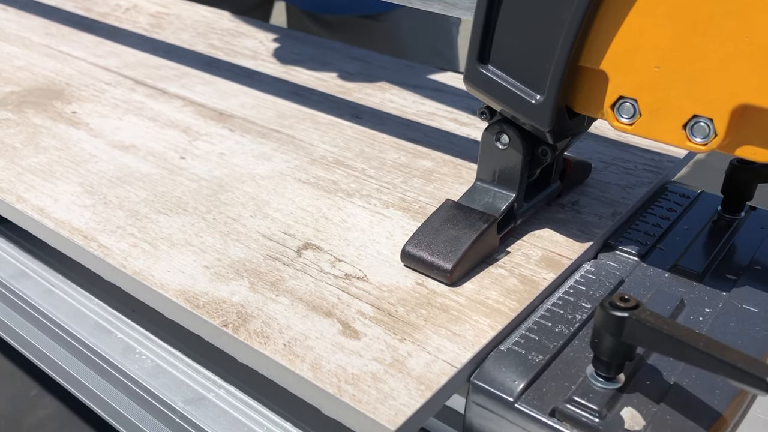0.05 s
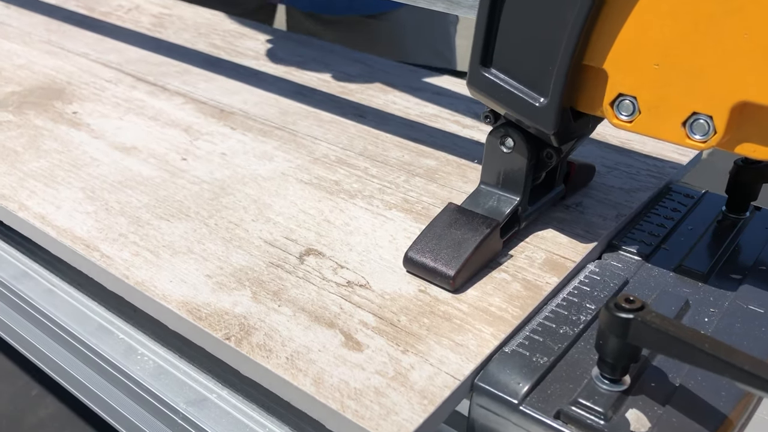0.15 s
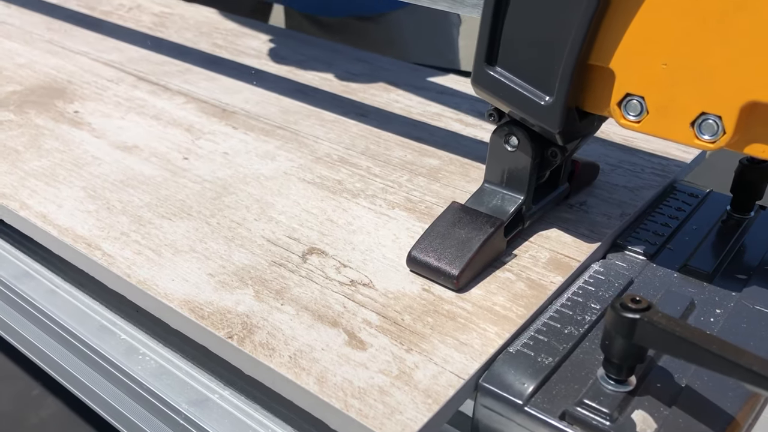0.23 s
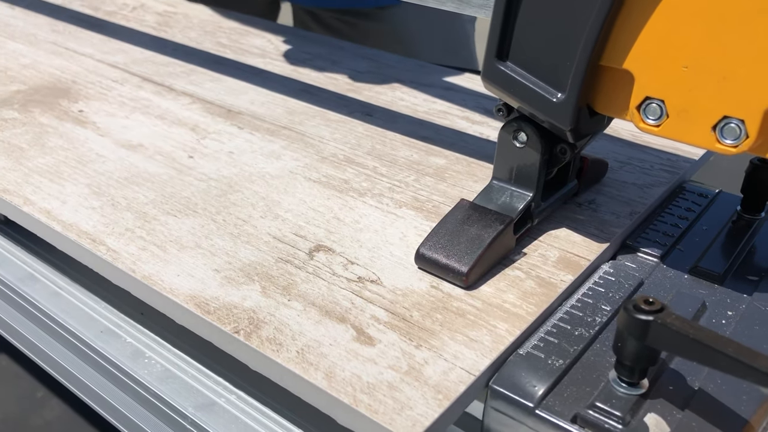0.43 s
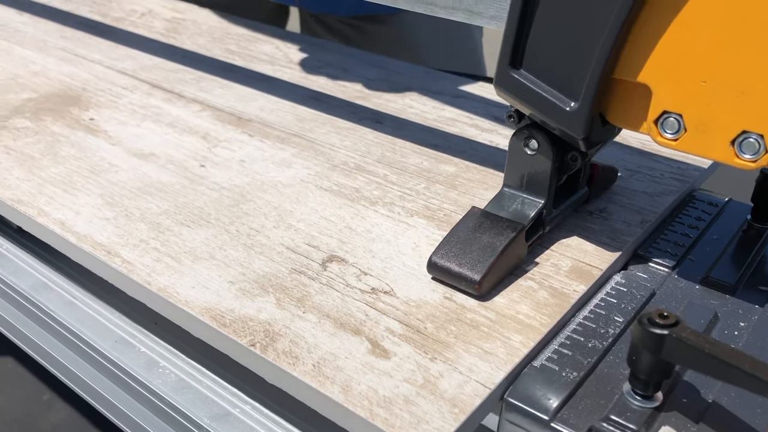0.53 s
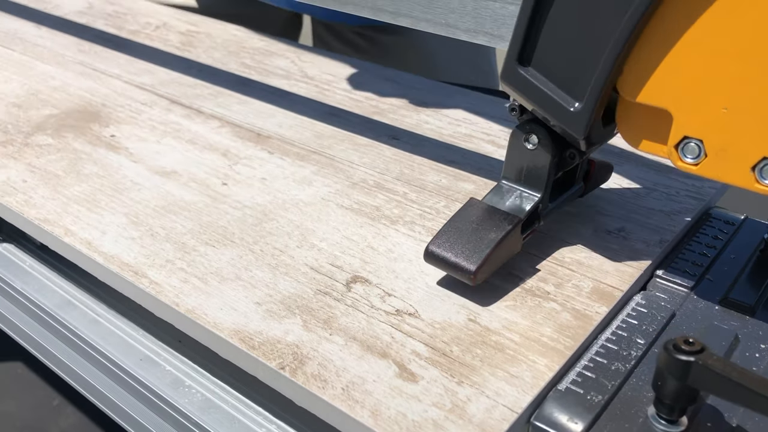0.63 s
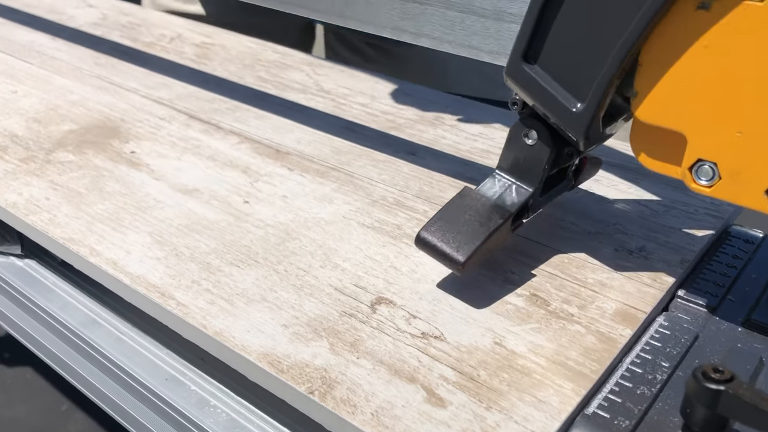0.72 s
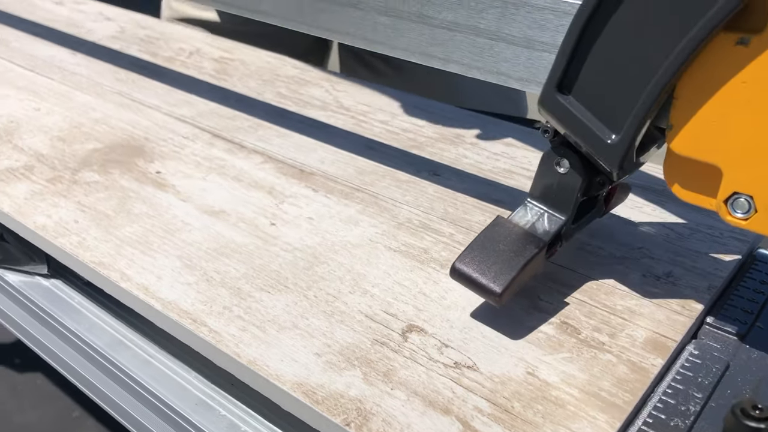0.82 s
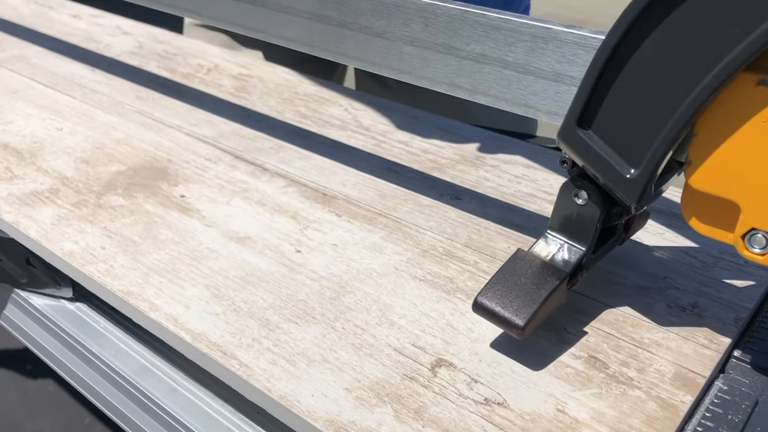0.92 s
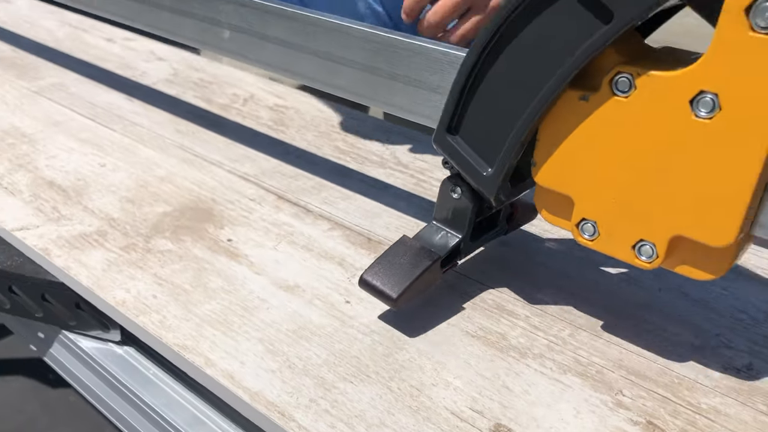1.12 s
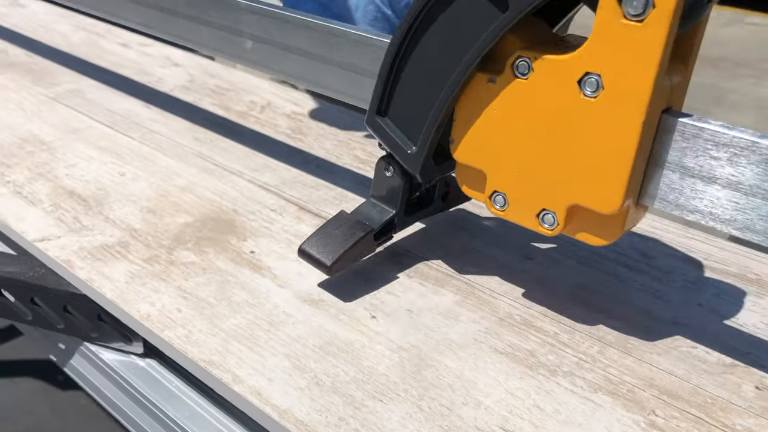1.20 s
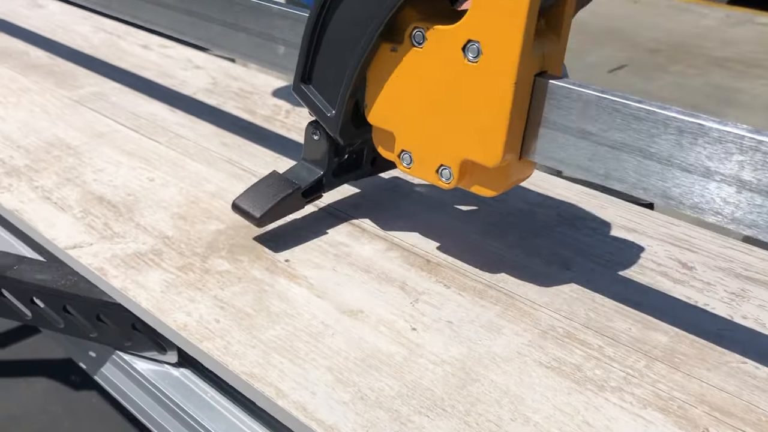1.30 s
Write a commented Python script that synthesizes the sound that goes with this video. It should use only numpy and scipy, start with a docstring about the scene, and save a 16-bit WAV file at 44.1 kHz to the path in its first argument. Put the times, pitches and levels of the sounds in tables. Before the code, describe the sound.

A hand tile cutter snaps a tile with sharp clacks, then knocks and slides back.

```python
"""A hand tile cutter outdoors, over a steady low rumble. The handle is pressed: the bench bumps and grit
crunches under a scored tile. The tile snaps and its halves knock on the cutter's bed, ringing tile and
frame. The lever is lifted against its stop with a knock, a thud and a brief buzz. Snap and knocks travel
as bending waves, so their treble arrives ahead of their bass. Last, the carriage rolls back along its
rail with a growing hiss."""
import sys
import numpy as np
from scipy import signal
from scipy.fft import rfft, irfft
from scipy.io import wavfile

SR = 44100
rng = np.random.default_rng(int(sys.argv[2]) if len(sys.argv) > 2 else 0)


def int16_out(signal):
    """Quantize to a 16-bit WAV file."""
    q = np.round(np.clip(np.atleast_2d(signal).T, -1, 1) * 32767)
    wavfile.write(sys.argv[1], SR, q.astype(np.int16))


N = 59535
T = np.arange(N) / SR
HZ = np.maximum(np.arange(N + 1) * SR / (2 * N), 1)

# tone of the outdoor rumble: f/Hz, level/dB
RUMBLE_COLOUR = [(20, -35.5), (45, -13), (75, 2.5), (115, 1), (170, -8), (340, -7), (520, -17.5),
                 (1000, -25), (2000, -25.5), (4000, -33.5), (8000, -43.5), (17000, -50.5)]
# bumps of the bench as the handle is pressed: t/s, level/dB
BENCH_BUMPS = [(0.0, -39), (0.056, -37.5), (0.187, -42.5)]
# notes the bench rings at: f/Hz, level/dB, t60/s (the time to fade by 60 dB)
BENCH_NOTES = [(112, 0, 0.25), (131, -3, 0.23), (161, -6, 0.26), (205, -8.5, 0.13), (307, -6.5, .12)]
# grit crushed under the tile and in the joints: t/s, level/dB, rise/s, t60/s, bass/dB, treble/dB
CRUNCHES = [(0.0005, -29, 0.0051, 0.074, 1, 4.5), (0.016, -36, 0.0027, 0.16, 6.5, -13),
            (0.084, -50, .02, 0.48, -8, -1), (0.146, -37.5, 0.0024, .07, -1.5, -0.5),
            (0.185, -34, .001, 0.076, 18, -30), (0.2005, -39.5, .001, .04, -5, 3.5),
            (0.206, -34, 0.0016, 0.069, -2, -1), (0.347, -41, 0.0024, .07, -7, 11.5),
            (0.4103, -30.5, 0.0014, .05, -9, 5), (0.436, -34, 0.0048, .09, 9, 6),
            (0.457, -41, .002, .07, 1, -2), (0.836, -32.5, .003, 0.096, -9, -3),
            (0.946, -56, .01, 0.78, -7, 5)]
# tone of the grit: f/Hz, level/dB
CRUNCH_COLOUR = [(100, -17), (350, -7), (800, 2), (1300, 3.5), (1900, -1), (2600, -8), (3600, -1),
                 (6000, -10), (10000, -11.5), (12000, -10.5), (17000, -18.5)]
# tiny ticks of the lever's joints: t/s, level/dB
JOINT_TICKS = [(0.085, -59), (0.5667, -69.5), (0.583, -64.5), (0.5928, -58.5), (0.909, -66)]
# how hard the carriage rolls: t/s, level/dB
ROLL_EFFORT = [(0.9, -58.5), (1.034, -56.5), (1.067, -43), (1.12, -40), (1.155, -40), (1.2, -36.5),
               (1.27, -36.5), (1.35, -35.5)]
# tone of the rollers' hiss: f/Hz, level/dB
HISS_COLOUR = [(100, -38), (280, -18.5), (430, -1), (700, -5), (1100, -3), (1400, -9.5), (2100, -12.5),
               (3200, -15.5), (4000, -19), (6300, -16), (7400, -24.5), (9500, -30.5), (11500, -27.5),
               (17000, -34)]
# notes of the rail at mid-stroke: f/Hz, width/Hz, level/dB, glide/(Hz/s), growth/(dB/s)
RAIL_NOTES = [(695, 27, -6, -800, -5), (824, 29, -9.5, -400, -26), (1072, 17, -5, 330.5, 3),
              (1284, 23, -16, 301, 22), (1575, 42, -11.5, -200, 7), (1840, 90, -10.5, -0.5, 12),
              (2488, 72, -11.5, 450, -20), (3050, 61, -18, 0, -4), (4570, 110, -22, 1, 3),
              (5065, 140, -11, 201, -15), (6240, 330, -10.5, 700, 20)]
# the lever hits its stop: t/s, level/dB, t60/s, crack/dB, ring/dB
LEVER_KNOCK = (0.8289, -15, 0.0755, 5.5, -16)
# tone of that knock: f/Hz, level/dB
KNOCK_COLOUR = [(60, -19), (110, -17), (165, -8.5), (270, -10), (420, -8.5), (600, -11), (850, -2.5),
                (1150, -5), (1850, 1.5), (2300, -0.5), (2850, 5), (3500, -11), (5100, -16.5), (6100, -4),
                (7200, -16), (10000, -22), (17000, -32)]
# the lever's foot thuds: t/s, level/dB, t60/s
FOOT_THUD = (0.836, -22, 0.16)
# tone of that thud: f/Hz, level/dB
FOOT_COLOUR = [(60, -22.5), (115, -12), (170, -0.5), (270, -12.5), (390, -2), (560, -6), (720, -9.5),
               (850, -1.5), (1300, -13), (3000, -23.5), (17000, -62)]
# the lever buzzes as it settles: t/s, level/dB
LEVER_BUZZ = (0.856, -26.5)
# notes of the lever: f/Hz, level/dB, t60/s
LEVER_NOTES = [(395, -9, .27), (724, -17, 0.38), (822, -12, 0.22), (1213, -8.5, 0.13), (1767, 2, 0.082),
               (1790, -0.5, 0.11), (1868, -7, .36), (1888, 1, .24), (1910, -4, .11), (2810, -26, 0.16)]
# the tile snaps and its halves hit the bed:
# t/s, level/dB, bass/dB, treble/dB, t60/s, crack/dB, tile ring/dB, frame ring/dB
TILE_CLACKS = [(0.2236, -12, -7, -0.5, 0.049, -1, -12.5, -8), (0.2281, -22, 1, 1, .04, 2.5, -12, -10.5),
               (0.2432, -15.5, -2.5, 4.5, 0.068, -7.5, -4.5, -27.5),
               (0.2542, -16.5, 0, -2, 0.081, -3, -9, -23), (0.2599, -19, 8.5, 4.5, .06, -7.5, -11.5, -40.5),
               (0.2730, -17.5, 9.5, -0.5, 0.11, -4.5, -9.5, -14),
               (0.2932, -26, 6.5, -12, 0.093, -15.5, -6.5, -9),
               (0.3629, -17, -17.5, -4, 0.076, -2.5, -25, -4),
               (0.3656, -17.5, -20, -1, 0.044, -4, -31, -1.5)]
# tone of a clack: f/Hz, level/dB
TILE_COLOUR = [(60, -24), (120, -15.5), (190, -5.5), (260, -13), (400, -4.5), (700, -8), (1100, -0.5),
               (1400, -4.5), (1850, 1), (2700, -6), (3200, -8), (3800, -5.5), (4400, -7), (5200, -2.5),
               (6200, -3.5), (7300, -14.5), (10000, -19), (17000, -25.5)]
# notes of the tile: f/Hz, level/dB, t60/s
TILE_NOTES = [(197, -2.5, 0.12), (444, -5.5, 0.14), (733, -4, 0.15), (1057, 2, 0.17), (1764, -8, .15),
              (2144, -3.5, .11), (2560, 2, 0.097), (3064, -2, .13), (3515, -4.5, .11), (3660, 1, 0.076),
              (3894, -1, .1), (5280, 1, 0.046), (5680, -9, 0.087), (5750, -3, .1), (6360, -3.5, 0.17),
              (7180, -8.5, .12)]
# notes of the cutter's frame: f/Hz, level/dB, t60/s
FRAME_NOTES = [(568, -9.5, 0.2), (997, -12.5, .13), (1346, -9.5, 0.17), (1545, 0, .04), (1758, 7.5, 0.039),
               (1851, -0.5, .3), (1970, 6.5, .05), (2420, 1, .045), (3390, -6, 0.15), (3944, -7, .11),
               (5420, -8, 0.079), (8090, -10.5, .11), (8550, -13, 0.082)]


def from_db(db):
    """Turn decibels into a factor to multiply by."""
    return 10 ** (np.asarray(db) / 20)


def rms_one(x):
    """Scale a sound so that its average power is 1."""
    return x / np.sqrt(np.mean(x ** 2) + 1e-20)


def burst(x):
    """Give a short sound the energy of ten milliseconds at power 1."""
    return rms_one(x) * np.sqrt(.01 * SR / N)


def filtered(x, response):
    """Change the strength and timing of each frequency in a sound."""
    return irfft(rfft(x, 2 * N) * response)[:N]


def colour(points, bass_db=0, treble_db=0):
    """A filter through (Hz, dB) points, with bass and treble controls."""
    hz, db = np.transpose(points)
    curve_db = np.interp(np.log(HZ), np.log(hz), db)
    curve_db = curve_db + bass_db / (1 + (HZ / 750) ** 2) + treble_db / (1 + (4500 / HZ) ** 2)
    # this fold keeps the filter from sounding before it is struck
    cepstrum = irfft(np.log(from_db(curve_db)))
    cepstrum[1:N] *= 2
    cepstrum[N + 1:] = 0
    return np.exp(rfft(cepstrum))


def fade(t60):
    """A level that falls by 60 dB every t60 seconds."""
    return np.exp(-np.minimum(np.log(1000) * T / t60, 10 * np.pi))


def add(out, start, x):
    """Mix x into out, beginning at start seconds."""
    i = max(int(start * SR), 0)
    out[i:] += x[:N - i]


def grains(rough_db):
    """Noise made of countless tiny contacts of uneven size."""
    return rms_one(rng.standard_normal(N) * from_db(rough_db * np.minimum(rng.exponential(1, N), 5)))


def dense_ring(t60, bass_linger):
    """Crowded notes fade like noise; t60 holds at 2 kHz, and bass_linger makes low ones last longer."""
    noise = rfft(rng.standard_normal(N))
    hz = np.arange(len(noise)) * SR / N
    edges_hz = [30, 250, 500, 1000, 2000, 4000, 8000, 20000]
    out = np.zeros(N)
    for low, high in zip(edges_hz, edges_hz[1:]):
        band = irfft(noise * (hz >= low) * (hz < high), N)
        out += band * fade(t60 * (2000 / np.sqrt(low * high)) ** bass_linger)
    return burst(out)


def ring(notes, samples=16000):
    """A struck object rings at its own notes, each a little stronger or weaker on every blow."""
    t = T[:samples]
    out = np.zeros(N)
    for hz, db, t60 in notes:
        strength = from_db(db + rng.normal(0, 0.93)) * rng.choice([-1, 1])
        out[:samples] += strength * np.sin(2 * np.pi * hz * t) * np.exp(-np.log(1000) * t / t60)
    return burst(out)


def bending(travel_s, fastest_hz, slowest_hz=898):
    """A filter for bending waves: between the two pitches, lower ones travel slower and arrive later."""
    delay_s = travel_s * (np.sqrt(fastest_hz / np.clip(HZ, slowest_hz, fastest_hz)) - 1)
    return np.exp(-2j * np.pi * np.cumsum(delay_s) * SR / (2 * N))


def blow(tone, t60, crack_db, rebounds_per_s=1500):
    """One sharp crack, a quick rattle of rebounding contacts and the dense ring after it."""
    click = burst(1. * (T == 0))
    rebounds = (rng.random(N) < rebounds_per_s / SR) * rng.standard_normal(N)
    crack = burst(click + from_db(-2) * burst(rebounds * fade(t60=0.024)))
    return burst(filtered(from_db(crack_db) * crack + dense_ring(t60, bass_linger=0.096), tone))


def outdoor_rumble():
    """Steady noise, strongest in the bass."""
    return from_db(-48) * rms_one(filtered(rng.standard_normal(N), colour(RUMBLE_COLOUR)))


def yard_echo(sound):
    """The yard sends back a faint wash of echoes that gets duller as it fades."""
    swell = 1 - fade(t60=0.02)
    tail = dense_ring(t60=0.29, bass_linger=.18) * swell
    tail /= np.sqrt(np.sum(tail ** 2))
    return from_db(-19) * filtered(sound, rfft(tail, 2 * N))


def bench():
    """The bench under the cutter rings with low, dull bumps."""
    out = np.zeros(N)
    for start, db in BENCH_BUMPS:
        add(out, start, from_db(db) * ring(BENCH_NOTES))
    return out


def grit(rough_db=2.5, frame_db=-8):
    """Crushed grains crunch and faintly ring the frame; the lever's joints tick."""
    out = np.zeros(N)
    for start, db, rise_s, t60, bass_db, treble_db in CRUNCHES:
        crunch = grains(rough_db) * fade(t60) * np.minimum(T / rise_s, 1)
        crunch = burst(filtered(crunch, colour(CRUNCH_COLOUR, bass_db, treble_db)))
        add(out, start, from_db(db) * (crunch + from_db(frame_db) * ring(FRAME_NOTES)))
    for start, db in JOINT_TICKS:
        tick = filtered(grains(rough_db) * fade(t60=0.022), colour(CRUNCH_COLOUR, treble_db=2))
        add(out, start, from_db(db) * burst(tick))
    return out


def rail_note(hz, width_hz, db, glide, growth, mid_stroke_s=1.2, waver_hz=9.1, wavers_per_s=25):
    """A wavering note of the shaken rail; it glides as the carriage changes the rail's free length."""
    glide_start_s = ROLL_EFFORT[1][0]
    from_mid_s = np.maximum(T, glide_start_s) - mid_stroke_s
    shake = [filtered(rng.standard_normal(N), 1 / (1 + 2j * HZ / width_hz) ** 2) for _ in range(2)]
    waver = waver_hz * np.interp(T * wavers_per_s, np.arange(100), rng.standard_normal(100))
    phase = 2 * np.pi * np.cumsum(hz + glide * from_mid_s + waver) / SR
    note = rms_one(shake[0] * np.cos(phase) + shake[1] * np.sin(phase))
    return from_db(db + growth * from_mid_s) * note


def carriage(treble_hz=3000, brightening=0.71):
    """Rollers hiss over the slightly rough rail and make it ring; faster is louder and brighter."""
    times, levels_db = np.transpose(ROLL_EFFORT)
    effort_db = np.interp(T, times, levels_db)
    hiss = rms_one(filtered(grains(rough_db=1.5), colour(HISS_COLOUR)))
    rail = sum(rail_note(*row) for row in RAIL_NOTES)
    roll = from_db(-2) * hiss + from_db(-4) * rail
    treble = filtered(roll, 1 / (1 + (treble_hz / HZ) ** 2))
    treble_gain = from_db(brightening * (effort_db - levels_db[-1]))
    return (T > times[0]) * from_db(effort_db) * (roll - treble + treble * treble_gain)


def lever():
    """The lever knocks on its stop, its foot thuds, and a brief buzz leaves it ringing."""
    out = np.zeros(N)
    start, db, t60, crack_db, ring_db = LEVER_KNOCK
    knock = blow(colour(KNOCK_COLOUR), t60, crack_db)
    add(out, start, from_db(db) * (knock + from_db(ring_db) * ring(LEVER_NOTES)))
    start, db = LEVER_BUZZ
    add(out, start, from_db(db) * ring(LEVER_NOTES))
    out = filtered(out, bending(travel_s=0.00595, fastest_hz=3373))
    start, db, t60 = FOOT_THUD
    thud = filtered(dense_ring(t60, bass_linger=0), colour(FOOT_COLOUR))
    add(out, start, from_db(db) * burst(thud))
    return out


def tile(bass_hz=600):
    """The snap and the knocks of the two halves ring the tile and the cutter's frame."""
    out = np.zeros(N)
    for start, db, bass_db, treble_db, t60, crack_db, tile_db, frame_db in TILE_CLACKS:
        hit = blow(colour(TILE_COLOUR, bass_db, treble_db), t60, crack_db)
        rings = from_db(tile_db) * ring(TILE_NOTES) + from_db(frame_db) * ring(FRAME_NOTES)
        bass = signal.sosfilt(signal.butter(1, bass_hz, fs=SR, output="sos"), rings)
        add(out, start, from_db(db) * (hit + rings + (from_db(bass_db) - 1) * bass))
    return filtered(out, bending(travel_s=.0027, fastest_hz=4700))


def scene():
    """The cutter, its echo in the yard and the rumble, mixed into one channel."""
    blows = tile() + lever() + grit()
    return (blows + yard_echo(blows) + outdoor_rumble() + bench() + carriage())[None]


def record(dry, ceiling=1.6, cutoff_hz=17600):
    """Round off the loudest peaks and cut the highest treble."""
    rounded = ceiling * np.tanh(dry / ceiling)
    return signal.sosfilt(signal.cheby1(12, .1, cutoff_hz, fs=SR, output="sos"), rounded)


dry = scene()
out = record(dry)
int16_out(out)
```